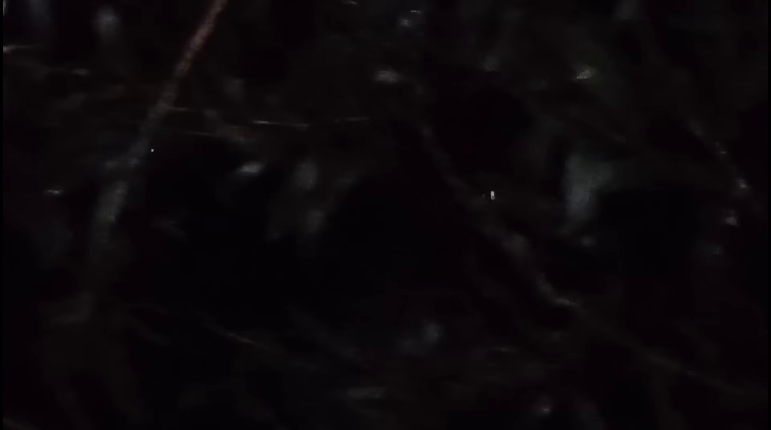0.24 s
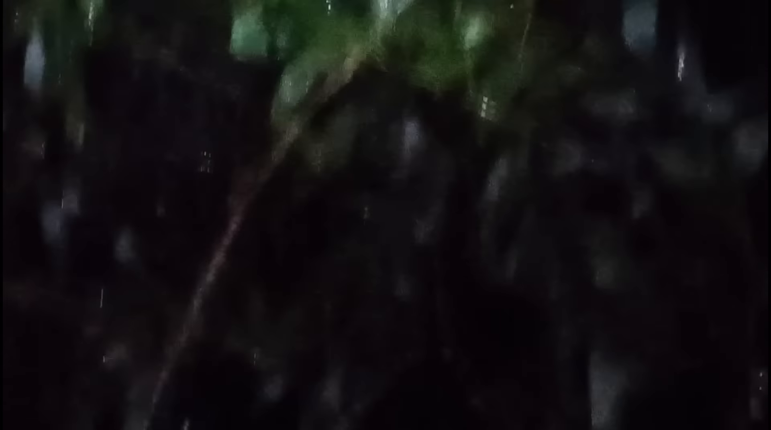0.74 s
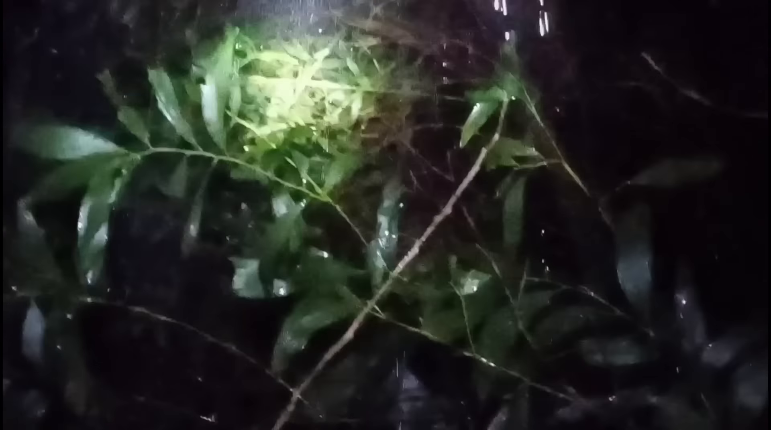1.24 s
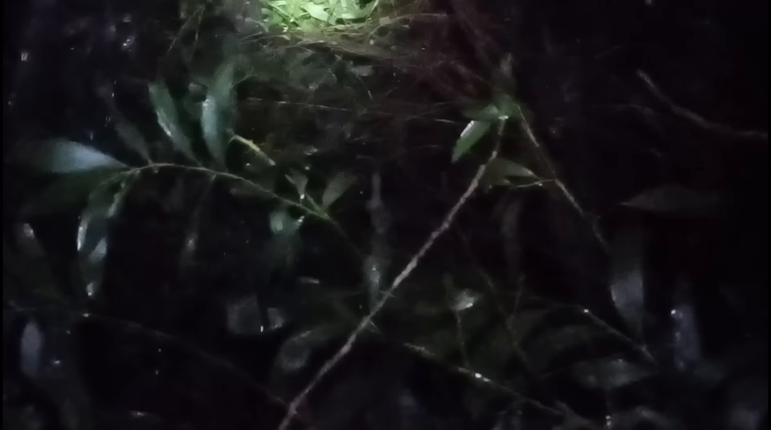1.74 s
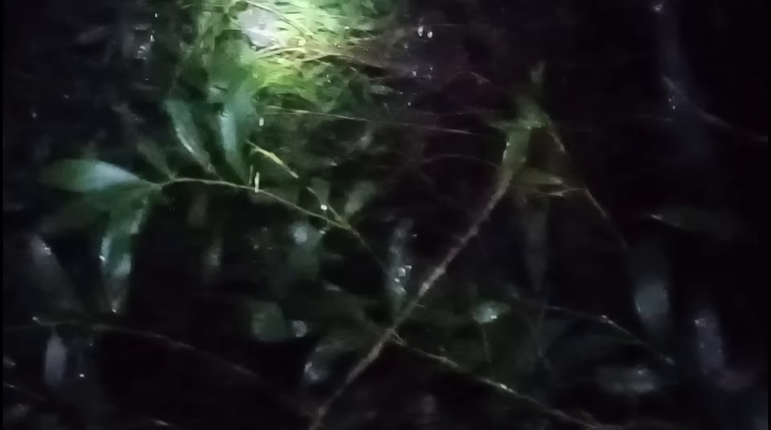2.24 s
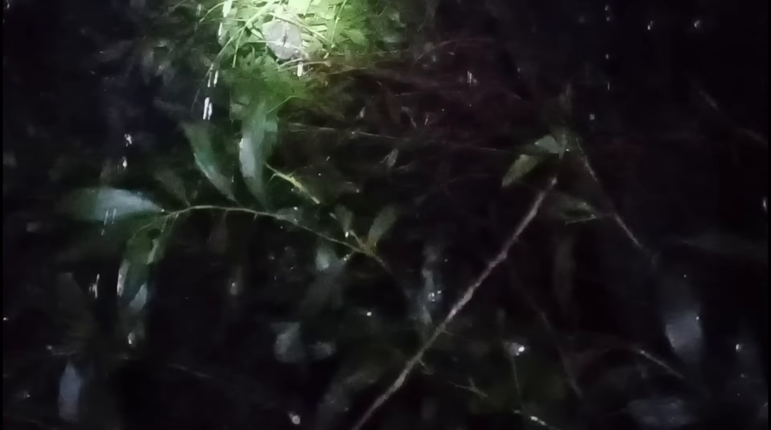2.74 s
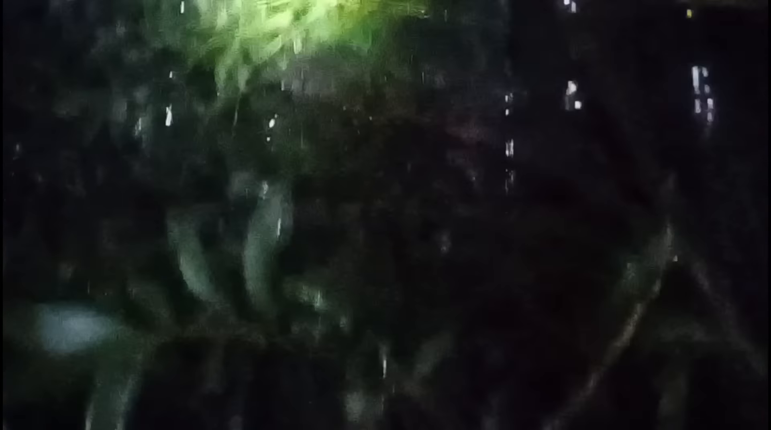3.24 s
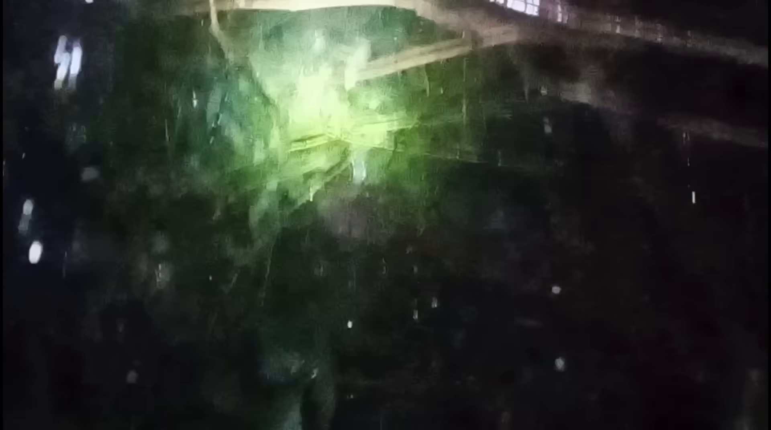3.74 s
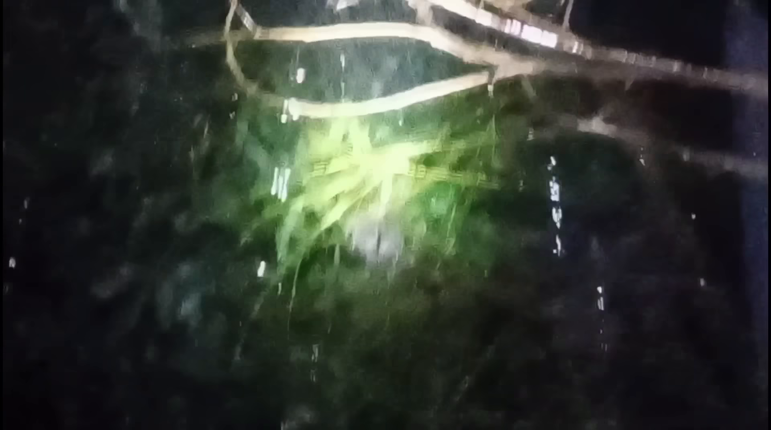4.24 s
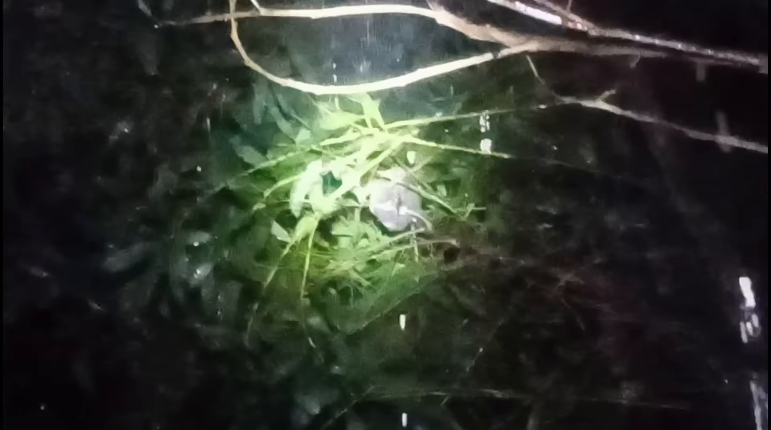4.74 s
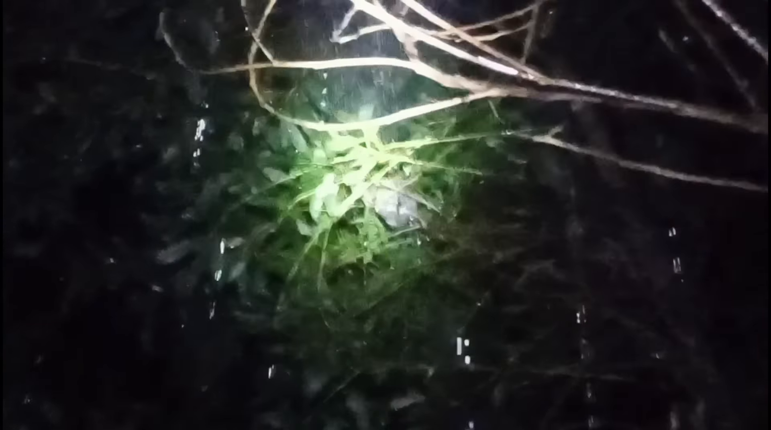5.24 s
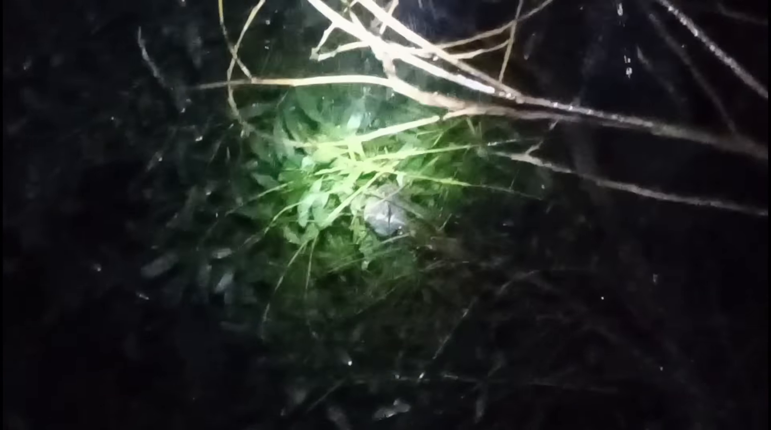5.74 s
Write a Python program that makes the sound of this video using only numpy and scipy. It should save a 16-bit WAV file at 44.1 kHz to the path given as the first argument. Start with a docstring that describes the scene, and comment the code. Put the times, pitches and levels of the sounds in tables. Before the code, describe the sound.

Steady rain falls on grass and leaves for the whole six seconds, heard in stereo from a hand-held microphone outdoors at night. Far drops merge into an even, bright hiss, nearer ones patter finely, and a faint, dull wash lies underneath with soft drips from branches. Single fat drops tick and plop on close leaves at irregular moments, the sharpest at about 0.5, 1.9, 3.5, 4.0 and 4.7 seconds, scattered left and right. Between about 3 and 4 seconds the rain loses a little body. At around 3.4 seconds a breeze starts buffeting the microphone on the left, a low, lumpy rumble that stays to the end, with soft thumps strongest near 4.0, 5.1 and 5.7 seconds. One drop makes a tiny, high plink in a puddle at about 4.9 seconds. The rain never stops.

```python
"""Steady night rain on grass and leaves: countless far drops merge into hiss, nearer ones patter,
and single close drops tick or plop on leaves, each a sine that dies within a few cycles.
Branches drip, one drop plinks in a puddle, and a dull wash of the surroundings lies underneath.
A hand-held camera hears it through two differently coloured microphone ports; halfway through,
it tilts away from the leaves and a breeze starts to buffet the left port."""
import sys
import numpy as np
from scipy import signal
from scipy.fft import rfft, irfft, next_fast_len
from scipy.io import wavfile
from scipy.ndimage import map_coordinates

SR = 44100
rng = np.random.default_rng(int(sys.argv[2]) if len(sys.argv) > 2 else 0)


def master(y):
    """Save y as 16-bit WAV."""
    cut = np.clip(np.atleast_2d(y).T, -1, 1)
    pcm = np.round(cut * 32767)  # scale
    wavfile.write(sys.argv[1], SR, pcm.astype(np.int16))


N = 263713
TOP_HZ = 15550  # the camera's band limit


def amp(db):
    """Decibels to gain."""
    return 10 ** (np.asarray(db) / 20)


def unit(x):
    """Scaled to rms 1."""
    return x / np.sqrt(np.mean(x ** 2) + 1e-20)


def eq_gain(points, hz):
    """Gain of an EQ curve: (freq_hz, gain_db) points joined on a log axis."""
    freq_hz, gain_db = np.transpose(points)
    return amp(np.interp(np.log(hz + 1), np.log(freq_hz + 1), gain_db))


def automation(rows):
    """One value per sample from (time_s, value) rows."""
    return np.interp(np.arange(N) / SR, *np.transpose(rows))


def wobble(rate_hz):
    """A smooth random curve through rate_hz knots a second."""
    knots = np.random.default_rng(rng.integers(2 ** 20)).standard_normal(int(N * rate_hz / SR) + 4)
    return map_coordinates(knots, [np.arange(N) * rate_hz / SR])


def filtered(x, response):
    """Zero-phase filter with gain response(hz)."""
    size = next_fast_len(N + SR // 2)
    return irfft(rfft(x, size) * response(np.fft.rfftfreq(size, 1 / SR)), size)[..., :N]


def noise(spectrum):
    """Two unrelated noises with the given spectrum; rms 1."""
    return unit(filtered(rng.standard_normal((2, N)), lambda hz: eq_gain(spectrum, hz)))


def impacts(start_s, level_db, pitch_hz, pan_db, peak_cycles, samples, lag_s=0):
    """Stereo hits: sines that crest after peak_cycles, then die. Pan and lag are left minus right."""
    channels = []
    for side in (1, -1):
        onset = (start_s + side * lag_s / 2) * SR
        index = np.ceil(onset).astype(int) + np.arange(samples)[:, None]
        cycles = (index - onset) / SR * pitch_hz
        pan_gain = np.sqrt(2 / (1 + amp(-2 * side * pan_db)))
        envelope = cycles / peak_cycles * np.exp(1 - cycles / peak_cycles)
        hits = amp(level_db) * pan_gain * envelope * np.sin(2 * np.pi * cycles)
        channels.append(np.bincount(np.clip(index, 0, N).ravel(), hits.ravel(), N + 1)[:N])
    return np.array(channels)


def patter(centre_hz, octaves, range_db, peak_cycles, width_db, count, samples):
    """Drops at random times, bearings and pitches, most of them far and faint; rms 1."""
    when, tuning, bearing, area = rng.random((count, 4)).T
    pitch_hz = np.minimum(centre_hz * 2 ** (octaves * (2 * tuning - 1)), TOP_HZ)
    level_db = -10 * np.log10(area + amp(-2 * range_db))  # even over the ground, fading with distance
    side = 2 * bearing - 1
    return unit(impacts(when * N / SR, level_db, pitch_hz, width_db * side, peak_cycles, samples,
                        lag_s=-0.0004 * side))


# Tone of the low ambience bed: freq_hz, gain_db
WASH_SPECTRUM = [(20, -22), (70, -11.5), (120, 0), (280, -0.5), (550, -5.5), (900, -11.5), (1800, -24)]
def distant_wash():
    """The dull wash of the surroundings, nearly alike at both ports."""
    mid, side = noise(WASH_SPECTRUM)
    return amp(-42.5 + 1.17 * wobble(8)) * (mid + amp(-17) * np.array([side, -side]))


# Tone of the wind rumble: freq_hz, gain_db
BUFFET_SPECTRUM = [(10, -16), (25, -3), (60, 5.5), (120, 0.5), (190, -13.5), (300, -25), (700, -57)]
# The breeze rises out of near calm, then holds: time_s, strength_db
BREEZE_SWELL = [(0, -60), (1.9, -60), (3.25, -50), (3.55, -37), (5.3, -37.5), (5.98, -34.5)]
# Thumps of the strongest eddies at the left port: centre_s, peak_db
EDDY_THUMPS = [(3.451, -19), (3.727, -21), (3.775, -24), (3.94, -16.5), (3.976, -13), (4.118, -22),
               (4.516, -18.5), (4.629, -18.5), (4.983, -17.5), (5.06, -17.5), (5.127, -14), (5.739, -15),
               (5.861, -16.5)]
def breeze():
    """Lumpy turbulence rumbles and thumps at the left port; the right one is sheltered."""
    lumps = amp(3.6 * np.array([wobble(50), wobble(50)]))
    gusts_db = automation(BREEZE_SWELL) + 2.5 * wobble(12)
    exposure_db = np.array([[3], [-13]])  # left, right
    buffet = unit(lumps * noise(BUFFET_SPECTRUM)) * amp(gusts_db + exposure_db)
    t = np.arange(N) / SR
    thump_hz, width_cycles = 92.6, 0.4
    for centre_s, peak_db in EDDY_THUMPS:
        cycles = np.clip((t - centre_s) * thump_hz, -10, 10)
        # a passing eddy: one dip of pressure between two shoulders
        buffet[0] -= amp(peak_db) * np.cos(2 * np.pi * cycles) * np.exp(-(cycles / width_cycles) ** 2)
    return buffet


# A drop traps a ringing bubble in standing water: start_s, level_db, pitch_hz, pan_db
PUDDLE_PLINKS = [(4.872, -19, 5400, -1)]
def branch_drips():
    """A few heavier drops a second fall from branches onto ground and blades; one plinks in a puddle."""
    plops = patter(590, octaves=1, range_db=4, peak_cycles=0.35, width_db=4, count=20, samples=400)
    ticks = patter(9600, octaves=0.4, range_db=5, peak_cycles=0.42, width_db=9.7, count=20, samples=64)
    plink = impacts(*np.transpose(PUDDLE_PLINKS), peak_cycles=2.7, samples=500)
    return amp(-56.5) * plops + amp(-50) * ticks + plink


# Foreground hits on leaves: start_s, level_db, pitch_hz, pan_db
LEAF_HITS = [(0.2185, -18, 644, 1), (0.2723, -18.5, 1220, 1), (0.287, -12.5, 4470, 3),
             (0.5385, -9, 6800, 5), (0.8058, -24, 640, 3), (1.0372, -14.5, 3690, -1),
             (1.8861, -9, 9000, 18), (2.034, -11, 2180, -2), (2.133, -21.5, 630, 1),
             (2.1476, -12.5, 8840, 10), (2.4412, -24.5, 680, -10), (3.2518, -19, 1700, -11),
             (3.4531, -10, 3970, -20), (3.6102, -17, 1720, -16), (3.658, -13, 4590, -4),
             (3.7947, -12, 9090, 10), (3.9775, -10, 4300, -4), (4.5541, -14.5, 1310, -3),
             (4.6691, -5.5, 7260, 20), (5.006, -20.5, 378, 23), (5.0685, -19, 1190, 0),
             (5.4094, -13.5, 9110, 11), (5.4783, -17.5, 494, 3)]
def close_drops():
    """Single fat drops close by: a snap of contact, the leaf's ring, a spray of droplets."""
    start_s, level_db, pitch_hz, pan_db = np.transpose(LEAF_HITS)
    ring_cycles = 0.36 * (pitch_hz / 1000) ** 0.16  # small stiff blades ring more cycles
    rings = impacts(start_s, level_db, pitch_hz, pan_db, ring_cycles, samples=500)
    snap_hz = np.minimum(2 * pitch_hz, 12000)
    snaps = impacts(start_s, level_db - 2, snap_hz, pan_db, peak_cycles=0.32, samples=200)
    t = np.arange(SR // 20) / SR
    spray_t60_s = 0.084
    spray = rng.standard_normal((2, len(t))) * amp(-60 * t / spray_t60_s)
    splashes = signal.fftconvolve(rings, spray / np.linalg.norm(spray[0]), axes=1)[:, :N]
    return rings + snaps + amp(-4) * splashes


# Tone of the far rain's hiss: freq_hz, gain_db
HISS_SPECTRUM = [(100, -18), (300, -7), (700, -1), (1500, 2.5), (3000, 4.5), (8000, 0), (15000, -4.5)]
def rain():
    """Far drops merge into hiss; nearer ones tick on blades, tap on leaves and plop on wet ground."""
    hiss = amp(-28 + 0.28 * wobble(40)) * noise(HISS_SPECTRUM)
    ticks = amp(-37) * patter(6870, octaves=1.23, range_db=16, peak_cycles=0.35,
                              width_db=5.8, count=7000, samples=64)
    taps = amp(-44) * patter(1670, octaves=0.77, range_db=12, peak_cycles=0.32,
                             width_db=2.9, count=1500, samples=160)
    plops = amp(-48) * patter(492, octaves=0.97, range_db=12.5, peak_cycles=0.42,
                              width_db=1.7, count=600, samples=400)
    flurries = amp(0.28 * wobble(4.85) + 0.39 * wobble(25))  # slight swells, as of drops in clusters
    return (hiss + ticks + taps + plops) * flurries


# Low-shelf ride on the rain's body: time_s, gain_db
BODY_RIDE = [(0, 1), (2.7, 0.34), (3.9, -1), (5.98, -1.2)]
def tilt_away(shower):
    """The rain thins as the camera tilts up, away from the leaves that give it body."""
    body = filtered(shower, lambda hz: 1 / (1 + (hz / 3800) ** 4))
    return shower + (amp(automation(BODY_RIDE)) - 1) * body


# Colour of each microphone port: freq_hz, gain_db
LEFT_PORT_EQ = [(300, -3.5), (1050, -1.45), (1500, -5.5), (2200, -0.5), (2800, 0.5), (4100, -3),
                (5300, -6.5), (6250, -11), (7200, -1.2), (8100, 6.2), (9300, -0.8), (12200, -6.5),
                (13800, -16), (15500, -23)]
RIGHT_PORT_EQ = [(300, -3), (1050, -1), (1550, -5), (2200, 1), (2800, 3), (4100, 5), (5300, 10), (6000, 10),
                 (6800, 4), (7700, -8.5), (9200, -10.5), (12000, -6.5), (13800, 2.5), (15500, -4)]
def mic_port(x, colour, size=2048):
    """A microphone port rings and colours the sound, as a minimum-phase EQ."""
    cepstrum = irfft(np.log(eq_gain(colour, np.fft.rfftfreq(size, 1 / SR))))
    causal_fold = 1 + np.sign(size // 2 - np.arange(size))
    causal_fold[0] = 1
    ring = irfft(np.exp(rfft(cepstrum * causal_fold)))
    return signal.fftconvolve(x, ring)[:N]


def scene():
    """Rain and surroundings through the two ports, with the breeze on top."""
    left, right = tilt_away(rain()) + close_drops() + branch_drips() + distant_wash()
    return np.array([mic_port(left, LEFT_PORT_EQ), mic_port(right, RIGHT_PORT_EQ)]) + breeze()


def record(dry):
    """A brick-wall high cut at the camera's band limit."""
    return filtered(dry, lambda hz: hz < TOP_HZ)


dry = scene()
out = record(dry)
master(out)
```